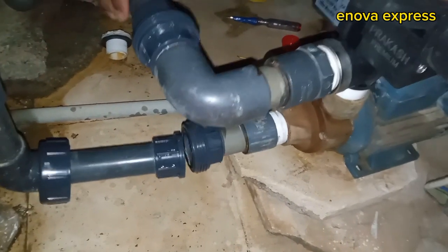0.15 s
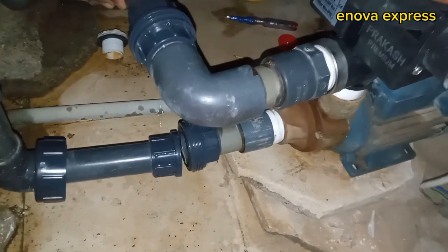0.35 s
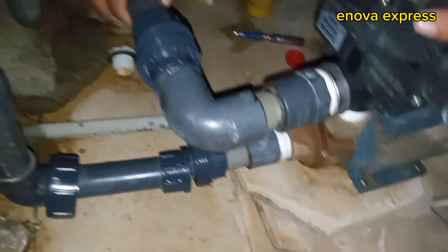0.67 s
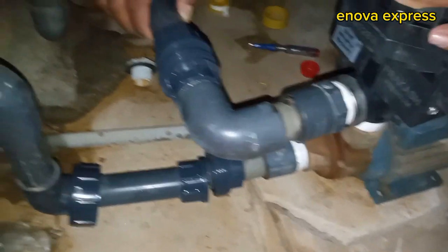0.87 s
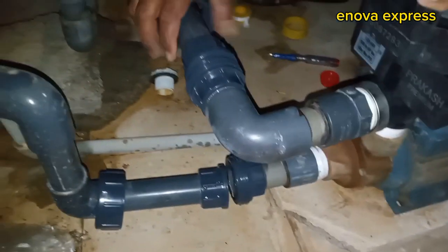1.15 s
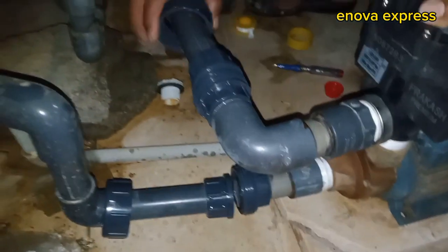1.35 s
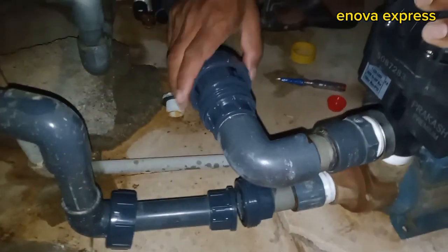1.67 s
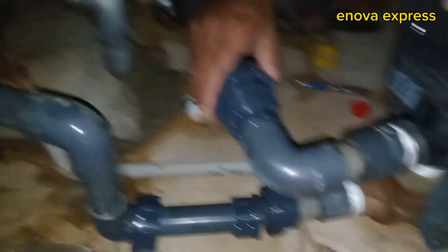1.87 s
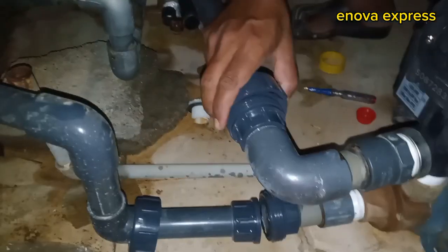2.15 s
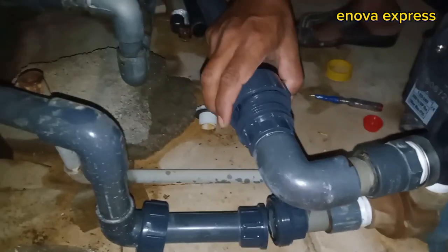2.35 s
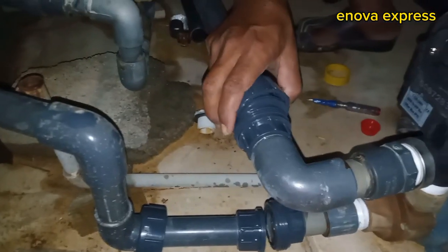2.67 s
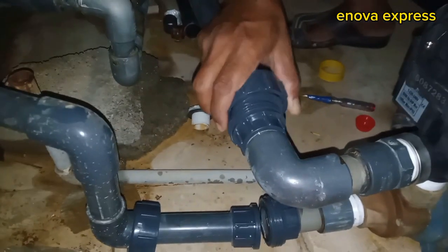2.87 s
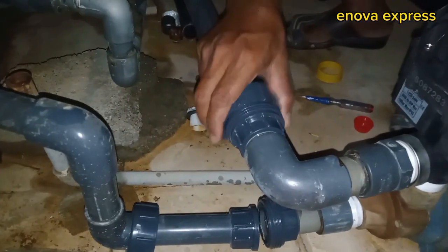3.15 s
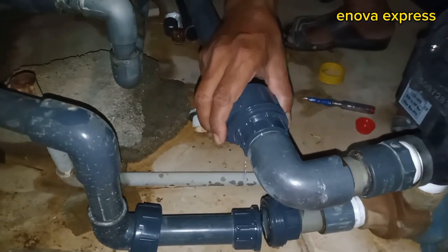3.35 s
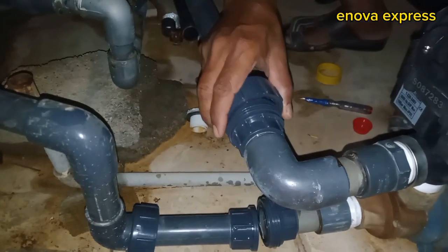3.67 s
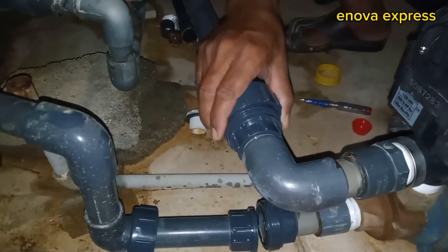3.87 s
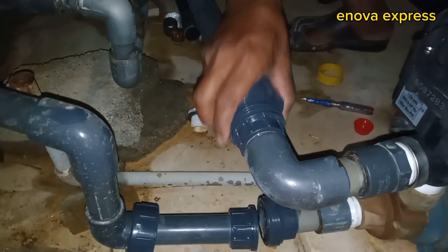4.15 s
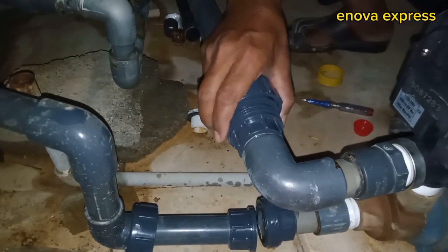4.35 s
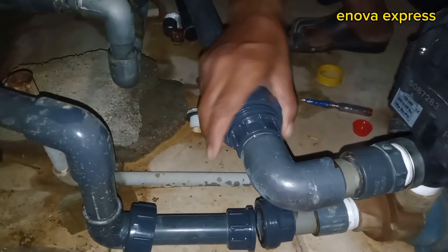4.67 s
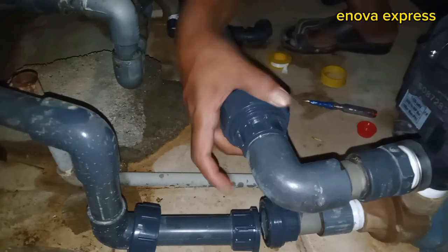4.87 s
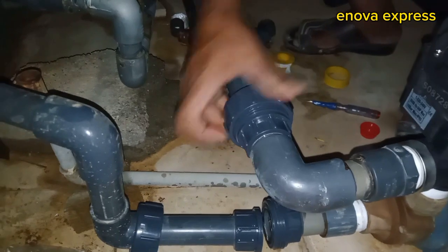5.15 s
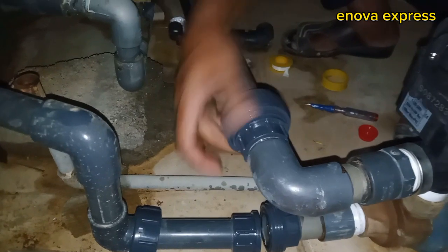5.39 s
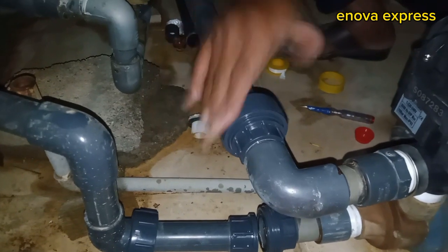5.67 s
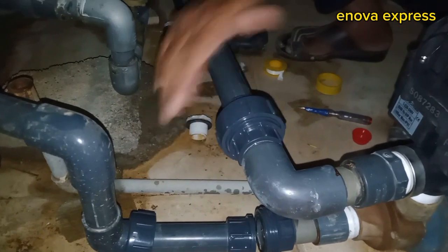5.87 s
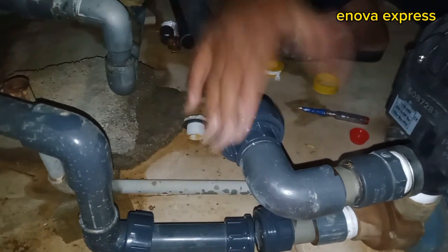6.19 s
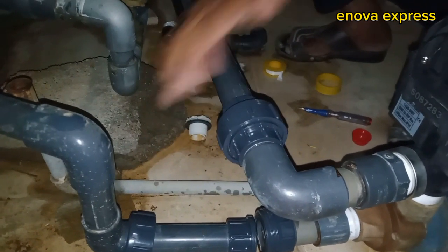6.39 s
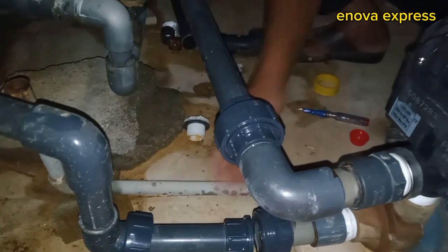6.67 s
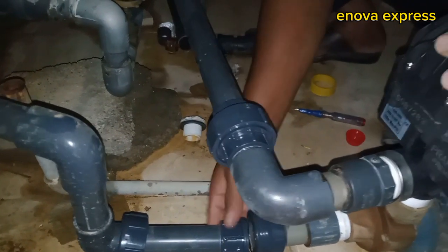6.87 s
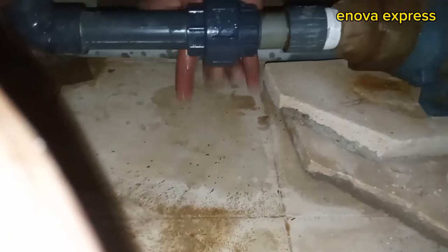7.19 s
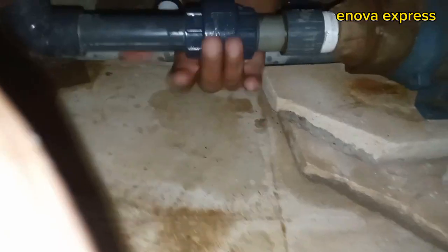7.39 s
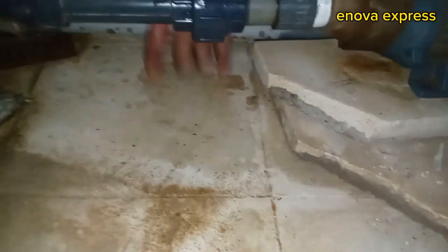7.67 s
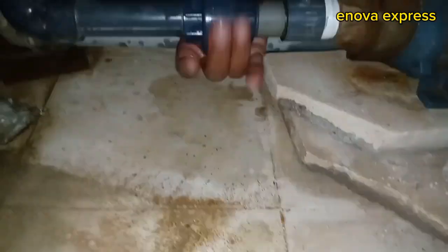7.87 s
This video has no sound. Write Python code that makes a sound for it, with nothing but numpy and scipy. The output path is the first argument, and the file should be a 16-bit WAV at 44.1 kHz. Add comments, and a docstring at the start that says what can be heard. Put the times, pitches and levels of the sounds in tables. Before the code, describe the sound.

In a small hard-surfaced room, a low wavering hum and faint hiss run throughout. After a light tick and soft bump, plastic pipe fittings are pushed together with a cluster of clicks and a loud clack around one and a half seconds. Sparse knocks follow, including two sharp ones before five seconds, then quick rubbing and rattles as a nut is spun. A hand scrapes briefly near the end. The microphone is close.

```python
"""A low wavering hum and a faint hiss lie underneath from the start; a light tick and soft bumps come first.
From about one second, hard plastic pipe fittings are pushed together, close by, in a small tiled room.
They knock and click as bursts of short-lived wall modes, and the pipe rings briefly after hard knocks.
A union nut is spun tight by hand: threads and skin rub as streams of tiny slips, with a few faint squeaks.
Near the end a hand scrapes along under the lower pipe, between the last knocks."""
import sys
import numpy as np
from scipy import signal
from scipy.fft import rfft, irfft, next_fast_len
from scipy.io import wavfile
from scipy.ndimage import uniform_filter1d, map_coordinates

SR = 44100
rng = np.random.default_rng(int(sys.argv[2]) if len(sys.argv) > 2 else 0)


def unload_audio(sound):
    """Save the sound as a 16-bit wav file, at the path given as the first command line argument."""
    columns = np.transpose(np.atleast_2d(sound))
    # keep every value between -1 and 1, then stretch to whole-number steps
    steps = np.round(np.clip(columns, -1, 1) * 32767)
    wavfile.write(sys.argv[1], SR, steps.astype(np.int16))


N = 354123  # length in samples
TOP_HZ = 16200  # nothing is kept from here up

# Contacts of the fittings. Each row: time in seconds, level in dB (before a cut shared by all knocks),
# then hollow body, wall, edge and snap in dB against that level (before a shared trim),
# loudest wall mode in Hz, its strength in dB.
CONTACTS = [(1.104, -29.5, -4, -24, -2.5, -7.5, 780, -2), (1.1421, -40.5, -4, -25, 0.5, -9, 2430, 5.5),
            (1.209, -46, -15, -30, 8, -6, 2990, 2), (1.278, -44.5, -10, -38, -3.5, -14, 2280, 4.5),
            (1.3977, -35, -50, -21, -7, -10, 3050, 1.5), (1.419, -33.5, -33, -13.5, -7, -10, 2910, 3),
            (1.452, -31, -28, -18, -1, -7.5, 2040, -17), (1.512, -26, -4.5, 2, -8, -14, 2350, 1),
            (1.5296, -13, -16, -10.5, -5.5, -14.5, 2370, -20),
            (1.7439, -34, -3.5, -1.5, -8.5, -32, 767, -1.5), (1.7915, -40, -3, -13.5, -25, -34.5, 800, 1.5),
            (2.0798, -62.5, -5.5, 18.5, -36, -45, 1532, 0.5),
            (2.808, -30.5, -20, -13, -0.5, -9, 4045, -2.5), (2.8295, -40, -11, -1.5, -26, -38.5, 731, 1.5),
            (2.845, -39, -2.5, -11, -16, -27, 2142, 2.5), (4.407, -30, -23, -11.5, -8.5, -24, 2510, -9),
            (4.4559, -18.5, -10, -5.5, -2, -16, 1595, -3), (4.4859, -35.5, -4.5, 1, -20, -37, 783, 1),
            (4.8271, -13, -22, -13, -4, -16, 2804, -7), (5.4073, -27, -8, -2.5, -16, -26.5, 2555, 3.5),
            (5.626, -48.5, -13, -6, -1, -11, 1110, 18), (5.671, -33.5, -47, 1.5, -14, -14.5, 2324, 2),
            (5.9125, -25, -5.5, -7, -10.5, -19, 1220, 0.5), (5.936, -27.5, -4.5, -4, -16, -21, 780, -6),
            (6.163, -43, 9, 6, -36, -42, 788, -1), (6.2358, -35.5, 0.5, 5, -8, -11, 691, -3),
            (7.208, -25, -64, -46, -7, -9, 4350, -4.5), (7.226, -61, -40, -29, -4, -4, 2900, 2),
            (7.2538, -25.5, -29.5, -15, -17, -39, 2120, 1), (7.6911, -32.5, -52, -9.5, 0, -9.5, 1340, 8.5),
            (7.7178, -24.5, -59.5, -12, -3.5, -11, 4090, 6)]
# The colour of the fittings' plastic. Each row: frequency in Hz, relative level in dB per Hz.
PLASTIC_COLOUR = [(430, -22.5), (580, -3), (780, -3.5), (1000, -17), (1500, 0), (1950, -7.5), (2600, 0.5),
                  (3200, -4.5), (4200, -3), (6500, -1), (8000, -20.5), (13000, -28.5), (15200, -25),
                  (16500, -30)]
# The pipe's lasting modes. Each row: frequency in Hz, relative level in dB, time to fall 60 dB in seconds.
PIPE_MODES = [(765, -5, 0.44), (1437, -2.5, 0.54), (2123, -4.5, 0.57), (2530, 1, 0.16), (2737, 7.5, 0.36),
              (3730, 0, 0.26), (4530, -1.5, 0.12), (5670, -1.5, .19), (6580, -4.5, .12)]
RING_WIDTH_HZ = 10  # the gripping hand unsettles the ring a little

# Rubbing colours: fingers and threads, hand, skin, long pipe.
# Each row: frequency in Hz, relative level in dB per Hz.
NUT_COLOUR = [(880, -39.5), (1500, -8.5), (1630, -5.5), (2740, -9), (3300, -13), (3780, -5.5), (5750, -8),
              (14900, -22.5), (16500, -34.5)]
HAND_COLOUR = [(710, -63), (1200, -30), (1370, -12.5), (1720, -34), (2150, 0.5), (2950, -12), (3800, -1),
               (4670, -6.5), (5160, 3), (9640, -19.5), (12000, -28.5), (15300, -20), (16500, -28)]
SKIN_COLOUR = [(1700, -35), (2600, -7), (3400, -8.5), (5300, 1), (7000, -1), (8000, -8.5), (10500, -9),
               (13000, -17), (15300, -8), (16500, -18)]
PIPE_DRAG_COLOUR = [(400, -28), (580, 3.5), (800, 6.5), (1050, -11.5), (1500, -4.5), (1950, -8.5),
                    (2500, -9), (3400, -13), (5000, -31), (9000, -56)]
# Strokes: fingers and threads sliding on the upper union, the hand scraping along under the lower pipe,
# skin brushing lightly over the plastic, and the long pipe dragging as it is pushed home.
# Each row: start in seconds, length in seconds, level halfway in dB, growth over the stroke in dB.
NUT_MOVES = [(.98, .03, -75, 8), (1.12, 0.18, -79, 10), (1.4, 0.079, -56, 5.5), (1.69, 0.13, -63.5, 2.5),
             (5.42, 0.2, -68, -16.5), (5.665, 0.05, -52.5, 0), (5.92, 0.19, -58, -13),
             (6.18, 0.14, -57, -10.5)]
HAND_MOVES = [(7.265, 0.12, -51, 1.5), (7.73, 0.14, -50.5, -4)]
SKIN_MOVES = [(1.42, 0.076, -58, 3), (5.255, 0.16, -63, 18.5), (5.645, 0.065, -56, -9),
              (7.42, 0.113, -68.5, 11), (7.545, .14, -60.5, 3.5)]
DRAG_MOVES = [(.98, 0.038, -63, -1), (1.13, 0.2, -63.5, -10), (1.56, 0.15, -48.5, -16),
              (1.77, 0.27, -60, -24.5), (2.07, 0.044, -64.5, -13), (2.82, 0.12, -56.5, -17.5),
              (4.41, 0.08, -48, 1.5), (6.185, .05, -49, -1)]
RUB_ATTACK_S, RUB_RELEASE_S = 0.051, 0.11  # a stroke rises from, and falls to, 60 dB under its level
RUB_RING_DB, RUB_RING_WIDTH_HZ = 4.5, 65  # how strongly rubbing sings in the pipe, damped by the hand

# Faint squeaks of handling. Each row: time in seconds, level in dB, half length in seconds, pitch in Hz.
SQUEAK_EVENTS = [(2.994, -69.5, 0.009, 5760), (3.117, -63, 0.015, 1485), (6.421, -67, 0.058, 888),
                 (7.411, -64, 0.013, 1400)]
SQUEAK_WIDTH = 0.02  # bandwidth over pitch
# Light dry ticks of small parts. Each row: time in seconds, then frequency in Hz and level in dB
# for the low, the middle and the top mode.
TICK_EVENTS = [(0.0913, 2736, -27.5, 4900, -44, 7270, -37.5), (3.2461, 2070, -29.5, 3830, -41, 9340, -74.5),
               (3.7828, 1930, -43.5, 5152, -54, 6605, -61), (4.365, 2200, -52, 4150, -42, 6730, -73),
               (6.987, 2460, -49, 3290, -49, 5900, -48), (7.641, 1910, -52, 3900, -45, 5300, -61)]
TICK_T60_S, TICK_QUALITY = 0.026, 35  # time to fall 60 dB; pitch over bandwidth
TICK_CRACK_DB = -4.5  # the contact's crack against the average mode
# Dull bumps of handling. Each row: time in seconds, level in dB, half length in seconds, pitch in Hz.
BUMP_EVENTS = [(.16, -45, 0.054, 85), (0.995, -48, 0.029, 204), (0.988, -53.5, 0.025, 550),
               (1.755, -46, 0.25, 89.6), (5.94, -52.5, 0.033, 550), (6.478, -49.5, 0.072, 76.7),
               (6.909, -44.5, 0.027, 71.4), (7.28, -47.5, 0.028, 257)]

# How the room dies away. Each row: frequency in Hz, time to fall 60 dB in seconds.
ROOM_DECAY = [(300, 0.54), (750, 0.26), (1500, 0.26), (3000, 0.22), (6000, 0.21), (12000, 0.012)]

# The low hum and its hollow upper part. Each row: frequency in Hz, relative level in dB per Hz.
LOW_HUM_COLOUR = [(18, -72), (30, -46.5), (48, -38.5), (61, -19), (80, -13.5), (135, 2), (150, -2.5),
                  (205, -18), (231, -25.5), (302, -52.5), (550, -74), (920, -120)]
HOLLOW_COLOUR = [(200, -23.5), (260, -6.5), (312, 3.5), (360, -8), (420, -22.5), (520, -66)]
HUM_DB, HUM_WAVER_DB, HUM_WAVERS_PER_S = -51, 2.05, 7.7
# The hum dips or swells briefly. Each row: time in seconds, half length in seconds, change in dB.
HUM_LEVEL_SWINGS = [(1.731, 0.36, 4.5), (2.359, 0.063, -29.5), (2.48, 0.052, 7.5), (2.608, 0.068, -17.5),
                    (3.239, 0.024, -13.5), (4.117, 0.083, -20), (5.845, 0.076, -8.5), (6.064, 0.069, -13.5),
                    (6.395, 0.051, -13.5), (6.84, .025, -18.5), (7.178, 0.072, -25)]
# Spells of the hollow part. Each row: start in seconds, length in seconds, level in dB.
HOLLOW_SPELLS = [(0, 0.31, -57.5), (0.989, 0.44, -58), (1.57, 0.089, -47), (2.925, 0.11, -59.5),
                 (4.362, 0.23, -56.5), (4.843, 0.081, -58), (5.683, 0.14, -55.5), (6.224, 0.037, -56),
                 (6.696, .44, -56.5), (7.25, 0.67, -57)]
# Level of the hollow part between spells; how each spell comes and goes.
HOLLOW_REST_DB, HOLLOW_ATTACK_S, HOLLOW_RELEASE_S = -76, 0.12, 0.12

# The faint air noise and the treble hiss. Each row: frequency in Hz, relative level in dB per Hz.
AIR_COLOUR = [(220, -33.5), (380, -11), (431, -7.5), (877, -7), (995, -15.5), (1620, -10), (4180, -26.5),
              (8110, -40), (15200, -43), (16500, -36.5)]
TREBLE_HISS_COLOUR = [(2200, -17.5), (4000, 0), (6800, -1.5), (7800, -14.5), (16000, -15.5)]
AIR_DB = -75
# How the hiss changes. Each row: time in seconds, level in dB.
HISS_LEVEL_CURVE = [(0, -89), (1.001, -87), (1.9, -96), (2.4, -101), (2.7, -94), (8, -98)]


def knocks():
    """Each contact grazes, then shakes heavily damped wall modes for a few ms; a few pipe modes ring on."""
    out = np.zeros(N)
    around = np.arange(-SR // 50, SR // 14) / SR  # seconds before and after the contact
    after = np.maximum(around, 0)
    # hollow body, its upper neighbour the wall, a fixed middle, edge and snap, in Hz
    registers = [(470, 1000), (1000, 2000), (2000, 4500), (4500, 8000), (8000, 17000)]
    log_centres = np.log(np.prod(registers, axis=1)) / 2
    for s, db, body_db, wall_db, edge_db, snap_db, mode_hz, mode_db in CONTACTS:
        # hard knocks are short, light ones chatter for longer
        length = np.interp(db, [-40, -20], [.009, .0062])
        # the parts graze just before they meet
        graze = amp(-24.0) * np.exp(-np.abs(around) / 0.0053)
        blow = graze + (1 - np.exp(-after / 0.0013)) * np.exp(-(after / length) ** 2)
        # the wave runs to and fro in the fitting, then dies quickly
        fade = .18 * (1 - np.exp(-after / .002)) * amp(-60 * after / .1)
        burst = (blow + fade) * shiver(around, spacing_hz=339.2, quality=36)

        # where and how hard the parts meet sets the weight of each register
        weights = amp([body_db + 3.5, wall_db + 3.5, -1.0, edge_db - .5, snap_db])
        clack = sum(w * sized(band(burst, *edges)) for w, edges in zip(weights, registers))
        mode_weight = np.interp(np.log(mode_hz), log_centres, weights)
        tock = mode_weight * sized(np.sin(2 * np.pi * mode_hz * around) * blow)
        add(out, s + around[0], amp(db - 7.5) * (clack + amp(mode_db) * tock))
        ring_pipe(out, s, db, mode_hz, log_centres, weights)
    return out


def ring_pipe(out, s, db, mode_hz, log_centres, weights):
    """A knock wakes the pipe's modes, most of all those close to its loudest wall mode; each dies away."""
    t = np.arange(int(.3 * SR)) / SR
    for hz, ring_db, t60 in PIPE_MODES:
        closeness = np.exp(-(np.log(hz / mode_hz) / 0.086) ** 2)
        coupling = amp(3.7 * closeness) * np.interp(np.log(hz), log_centres, weights)
        waver = np.cumsum(rng.standard_normal(len(t))) * np.sqrt(2 * np.pi * RING_WIDTH_HZ / SR)
        ring = np.sin(2 * np.pi * (hz * t + rng.random()) + waver) * (1 - np.exp(-t / 0.0027))
        luck_db = rng.normal(0, 2)
        add(out, s, coupling * amp(db - 37.0 + ring_db + luck_db - 60 * t / t60) * ring)


def shiver(t, spacing_hz, quality):
    """The crowded wall modes together; loss widens each in proportion to its frequency."""
    hz = wall_modes(spacing_hz)[:, None]
    steps = rng.standard_normal((len(hz), len(t)))
    drift = np.cumsum(steps, axis=1) * np.sqrt(2 * np.pi * hz / quality / SR)
    strength = amp(rng.normal(0, 4.1, hz.shape))
    modes = strength * np.sin(2 * np.pi * (hz * t + rng.random(hz.shape)) + drift)
    return coloured(modes.sum(axis=0), PLASTIC_COLOUR)


def wall_modes(spacing_hz):
    """Unevenly spaced frequencies of a fitting's wall, new for each point of contact."""
    hz = 330 + np.cumsum(spacing_hz * rng.uniform(.25, 1.75, size=80))
    return hz[hz < TOP_HZ]


def slide(strokes, spectrum, slips_per_s, shift_db, flutter_db):
    """Tiny uneven slips excite the plastic and the pipe; the colour shifts as the point of contact moves."""
    slips = rng.standard_normal(N) * (rng.random(N) < slips_per_s / SR)
    singing = sum(signal.lfilter(*signal.iirpeak(hz, hz / RUB_RING_WIDTH_HZ, SR), slips)
                  for hz, _, _ in PIPE_MODES)
    shifting = patches(slips + amp(RUB_RING_DB) * singing, depth_db=shift_db)
    rub = steady(coloured(shifting, spectrum), span=0.073)
    return pressure(strokes) * amp(flutter_db * wobble(60)) * rub


def pressure(strokes):
    """Gain per sample: each stroke catches, presses harder or eases off evenly, and lets go."""
    t = np.arange(N) / SR
    total = 0
    for start, length, db, growth_db in strokes:
        lean_db = growth_db * np.clip((t - start) / length - .5, -.5, .5)
        total = total + amp(db + lean_db + swell(start, length, RUB_ATTACK_S, RUB_RELEASE_S))
    return total


def squeaks():
    """A rubbed surface sticks and slips for a moment at one unsteady pitch."""
    out, t = np.zeros(N), np.arange(int(.3 * SR)) / SR - .15
    for s, db, length, hz in SQUEAK_EVENTS:
        drift = np.cumsum(rng.standard_normal(len(t))) * np.sqrt(2 * np.pi * hz * SQUEAK_WIDTH / SR)
        tone = unit(band(np.sin(2 * np.pi * hz * t + drift), hz * .85, hz * 1.15))
        add(out, s + t[0], amp(db) * np.exp(-(t / length) ** 2) * tone)
    return out


def ticks():
    """A light touch rings three modes of a small part for a moment, too weakly to wake the pipe."""
    out, t = np.zeros(N), np.arange(int(.06 * SR)) / SR
    for s, *modes in TICK_EVENTS:
        hz, db = np.reshape(modes, (-1, 2)).T[:, :, None]
        steps = rng.standard_normal((len(hz), len(t)))
        drift = np.cumsum(steps, axis=1) * np.sqrt(2 * np.pi * hz / TICK_QUALITY / SR)
        ring = (amp(db - 60 * t / TICK_T60_S) * np.sin(2 * np.pi * hz * t + drift)).sum(axis=0)
        crack = amp(db.mean() + TICK_CRACK_DB - 60 * t / 0.011) * rng.standard_normal(len(t))
        onset = 1 - np.exp(-t / .002)
        add(out, s, band((ring + crack) * onset, 1300, 9000))
    return out


def bumps():
    """Soft low bumps: short swells of noise gathered around one pitch."""
    out, t = np.zeros(N), np.arange(int(.3 * SR)) / SR - .15
    for s, db, length, hz in BUMP_EVENTS:
        colour = [(hz / 4, -40), (hz * 0.73, -10), (hz, 0), (hz * 1.4, -8), (hz * 2, -50), (hz * 4, -110)]
        thud = steady(coloured(rng.standard_normal(len(t)), colour), span=0.045)
        ends = np.cos(np.pi * t / (2 * t[0]))  # brings both ends to silence
        add(out, max(s + t[0], 0), amp(db) * np.exp(-(t / length) ** 2) * ends * thud)
    return out


def room(x, echo_s, echo_db, tail_db):
    """A near wall answers twice, smeared by clutter; a diffuse tail dies, treble first."""
    hz, t, z = signal.stft(rng.standard_normal(int(.7 * SR)), SR, nperseg=256)
    tail = signal.istft(z * amp(-60 * t / along(ROOM_DECAY, hz)[:, None]), SR, nperseg=256)[1]
    t = np.arange(len(tail)) / SR
    tail = tail * (1 - np.exp(-t / 0.0043))
    answer = amp(tail_db) * tail / np.linalg.norm(tail)
    for bounce in range(1, 3):
        scatter = rng.standard_normal(len(t)) * np.exp(-t / 0.0044)
        add(answer, bounce * echo_s, amp(bounce * echo_db) * scatter / np.linalg.norm(scatter))
    return signal.fftconvolve(x, answer)[:N]


def hum():
    """A low wavering hum of shaped noise, with a hollow band above it that comes and goes."""
    t = np.arange(N) / SR
    low = steady(coloured(rng.standard_normal(N), LOW_HUM_COLOUR), span=0.24)
    hollow = steady(coloured(rng.standard_normal(N), HOLLOW_COLOUR), span=0.16)
    swing_db = sum(db * np.exp(-((t - s) / length) ** 2) for s, length, db in HUM_LEVEL_SWINGS)
    waver_db = HUM_WAVER_DB * wobble(HUM_WAVERS_PER_S)
    spells = sum(amp(db + swell(start, length, HOLLOW_ATTACK_S, HOLLOW_RELEASE_S))
                 for start, length, db in HOLLOW_SPELLS)
    return amp(HUM_DB + swing_db + waver_db) * low + (amp(HOLLOW_REST_DB) + spells) * hollow


def air():
    """The room's faint air noise, and a smooth hiss above it that is strongest at first."""
    hiss_db = np.interp(np.arange(N) / SR, *np.transpose(HISS_LEVEL_CURVE))
    low = coloured(patches(rng.standard_normal(N), depth_db=3.0), AIR_COLOUR)
    hiss = coloured(rng.standard_normal(N), TREBLE_HISS_COLOUR)
    return amp(AIR_DB) * low + amp(hiss_db) * hiss


def amp(db):
    """Decibels to gain."""
    return 10 ** (np.asarray(db) / 20)


def unit(x):
    """x at rms 1."""
    return x / np.sqrt(np.mean(x ** 2) + 1e-20)


def sized(x):
    """x scaled to the energy of 6 ms at rms 1."""
    return x / np.sqrt(np.sum(x * x) / (.006 * SR))


def along(points, hz):
    """(Hz, value) points read on a log frequency axis."""
    f, v = np.transpose(points)
    return np.interp(np.log(hz + 1), np.log(f), v)


def wobble(rate):
    """A smooth random curve, rate knots a second."""
    knots = rng.standard_normal(int(N * rate / SR) + 4)
    return map_coordinates(knots, [np.arange(N) * rate / SR])


def swell(start, length, attack_s, release_s):
    """dB per sample: attack, hold at 0, release."""
    t = np.arange(N) / SR - start
    return -60 * (np.maximum(-t, 0) / attack_s + np.maximum(t - length, 0) / release_s)


def coloured(x, spectrum):
    """x given a (Hz, dB) spectrum, at rms 1."""
    m = next_fast_len(len(x))
    gain = amp(along(spectrum, np.fft.rfftfreq(m, 1 / SR)))
    return unit(irfft(rfft(x, m) * gain, m)[:len(x)])


def band(x, lo_hz, hi_hz):
    """A band-pass that only looks back in time."""
    sos = signal.butter(4, [lo_hz, min(hi_hz, .49 * SR)], 'band', fs=SR, output='sos')
    return signal.sosfilt(sos, x)


def steady(x, span):
    """Noise with its swells slower than span seconds evened out."""
    power = uniform_filter1d(x * x, max(int(span * SR), 1))
    return x / np.sqrt(np.abs(power) + 1e-6)


def patches(x, depth_db):
    """x with soft patches of random gain in time and frequency."""
    z = signal.stft(x, nperseg=1024)[2]
    field = uniform_filter1d(rng.standard_normal(z.shape), size=5, axis=0)
    field = uniform_filter1d(field, size=5, axis=1)
    return signal.istft(z * amp(depth_db * unit(field)), nperseg=1024)[1][:N]


def add(track, s, sound):
    """Mix a sound into a track at s seconds."""
    part = track[round(s * SR):][:len(sound)]
    part += sound[:len(part)]


def scene():
    """Knocks, squeaks and rubbing in their room; drier ticks; bumps, hum and air without added room."""
    nut = slide(NUT_MOVES, NUT_COLOUR, slips_per_s=1600, shift_db=5.5, flutter_db=3.0)
    hand = slide(HAND_MOVES, HAND_COLOUR, slips_per_s=7100, shift_db=1.5, flutter_db=0.5)
    skin = slide(SKIN_MOVES, SKIN_COLOUR, slips_per_s=2500, shift_db=5.0, flutter_db=2.0)
    drag = slide(DRAG_MOVES, PIPE_DRAG_COLOUR, slips_per_s=1500, shift_db=6.5, flutter_db=1.0)
    fittings = knocks() + squeaks() + nut + hand + skin + drag
    small = ticks()
    wet = room(fittings + amp(-6) * small, echo_s=0.015, echo_db=-13.0, tail_db=-18.0)
    return (fittings + small + wet + hum() + bumps() + air())[None]


def record(dry):
    """Everything from the top frequency up is removed."""
    m = next_fast_len(N + SR // 2)
    return irfft(rfft(dry, m) * (np.fft.rfftfreq(m, 1 / SR) < TOP_HZ), m)[..., :N]


dry = scene()
out = record(dry)
unload_audio(out)
```